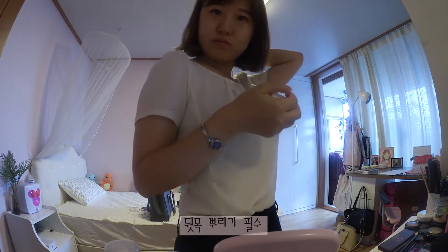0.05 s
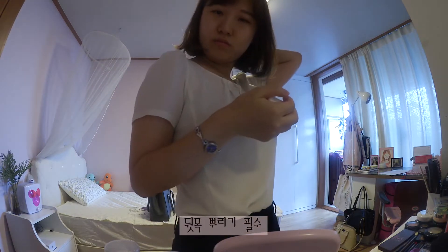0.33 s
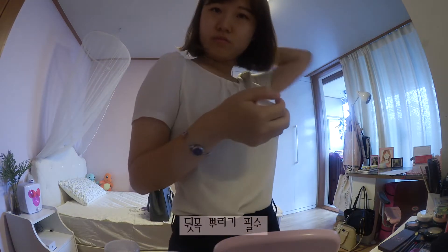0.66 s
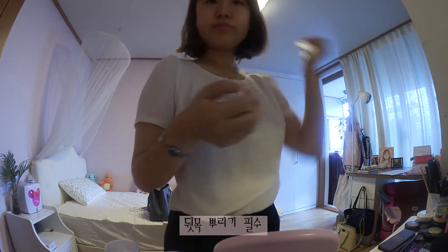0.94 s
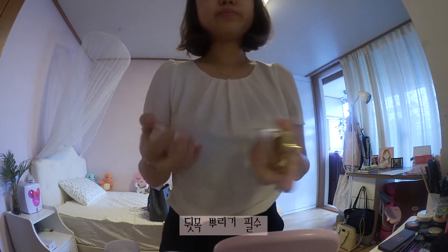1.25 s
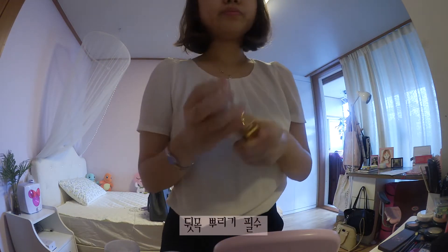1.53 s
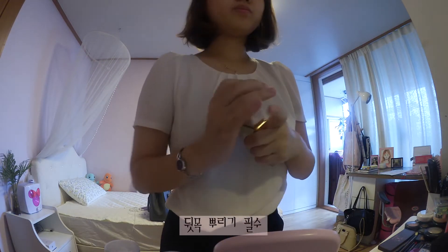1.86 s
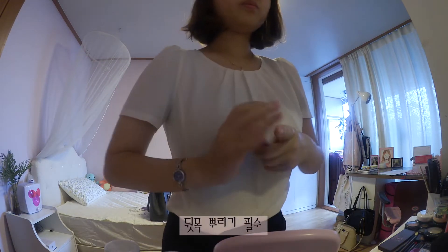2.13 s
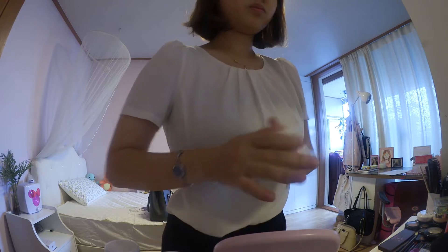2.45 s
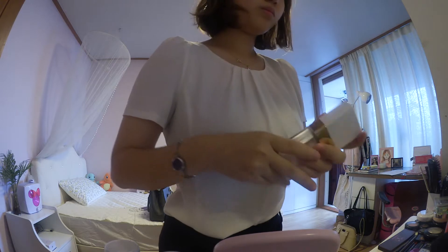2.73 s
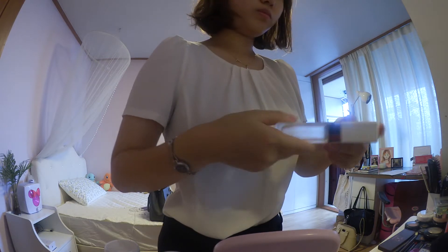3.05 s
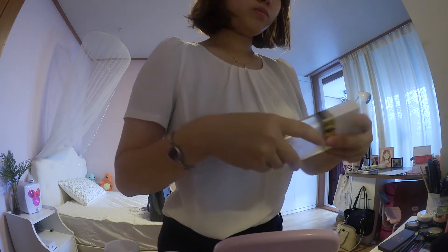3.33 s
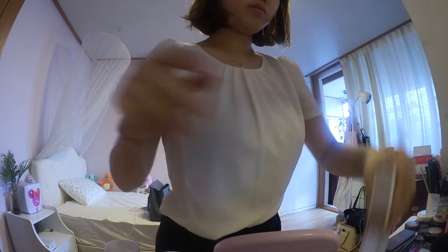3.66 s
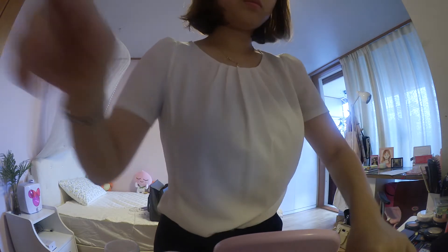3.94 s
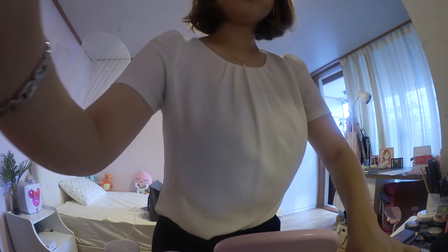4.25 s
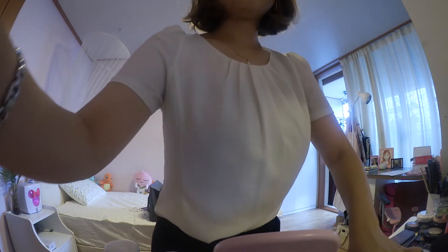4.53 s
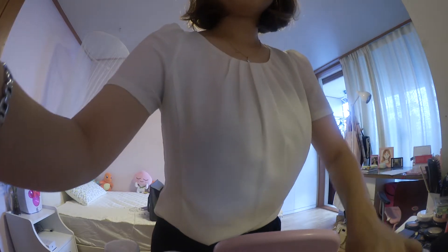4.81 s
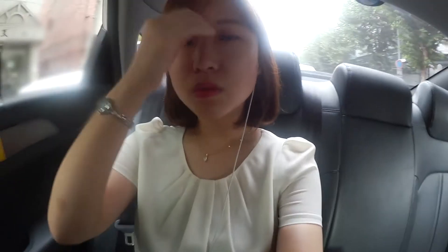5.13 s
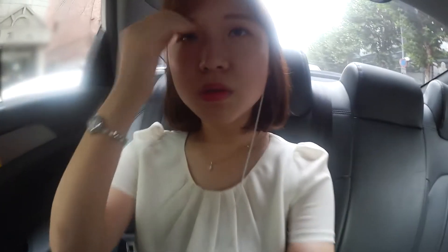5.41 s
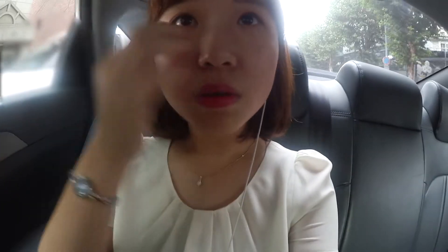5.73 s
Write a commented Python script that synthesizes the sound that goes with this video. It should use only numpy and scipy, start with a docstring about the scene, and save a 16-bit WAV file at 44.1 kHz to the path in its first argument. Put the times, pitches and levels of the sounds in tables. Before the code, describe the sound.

One short perfume spray, a plastic cap rattling and snapping shut, objects knocking on a wooden table, then low rumble inside a car.

```python
"""In a small bedroom a perfume atomiser gives one short puff of hissing mist. Its plastic cap rattles onto the
neck, slides down and snaps home with a thud. Soft swishes follow, among faint ticks: palm wipes on the bottle,
the last one faint. Then the bottle and other things knock on a wooden dressing table and set its top ringing.
Just before five seconds the scene cuts to the low, steady rumble inside a moving car."""
import sys
import numpy as np
from scipy import signal
from scipy.fft import rfft, irfft, next_fast_len
from scipy.io import wavfile

SR = 44100
rng = np.random.default_rng(int(sys.argv[2]) if len(sys.argv) > 2 else 0)


def put_to_file(sound):
    """Save the sound as 16-bit audio at rate SR, in the file named by the first command-line argument."""
    columns = np.atleast_2d(sound).T  # one column per channel
    safe = np.clip(columns, -1, 1)
    whole_steps = np.round(safe * 32767)
    wavfile.write(sys.argv[1], SR, whole_steps.astype(np.int16))


N = 259308
TIME = np.arange(N) / SR
RING = TIME[:SR // 2]  # time axis of one hit and its tail


def undb(db):
    """Decibels to gain."""
    return 10 ** (np.asarray(db) / 20)


def unit(x):
    """Scale to rms 1."""
    return x / np.sqrt(np.mean(x ** 2))


def add(track, s, sound):
    """Mix a sound into a track at time s."""
    start = int(s * SR)
    track[start:start + len(sound)] += sound[:N - start]


def high_pass(x, hz, order=2):
    """Roll off the lows."""
    return signal.sosfilt(signal.butter(order, hz, "high", fs=SR, output="sos"), x)


def low_pass(x, hz, order=1):
    """Roll off the highs."""
    return signal.sosfilt(signal.butter(order, min(hz, SR / 3), fs=SR, output="sos"), x)


def shaped(x, gain):
    """Filter by a gain that is a function of frequency."""
    size = next_fast_len(len(x))
    return irfft(rfft(x, size) * gain(np.fft.rfftfreq(size, 1 / SR) + 1), size)[:len(x)]


def coloured(x, points, size=4096):
    """Minimum-phase EQ through (frequency [Hz], level [dB]) points, keeping the energy."""
    hz, db = np.transpose(points)
    gain = undb(np.interp(np.log(np.fft.rfftfreq(size, 1 / SR) + 1), np.log(hz), db))
    cepstrum = irfft(np.log(gain))[:size // 2]
    response = irfft(np.exp(2 * rfft(cepstrum, size)))
    return np.std(x) * unit(signal.fftconvolve(x, response)[:len(x)])


def resonate(x, hz, q):
    """Pass a sound through one steep-sided resonance, keeping its energy."""
    b, a = signal.iirpeak(hz, max(q, hz / 8000), fs=SR)
    return np.std(x) * unit(signal.lfilter(b, a, signal.lfilter(b, a, x)))


def noise(points):
    """Steady noise of rms 1 with the given EQ curve."""
    return coloured(rng.standard_normal(N), points)


def resonant_noise(hz, q):
    """Steady noise of rms 1 in one resonance."""
    return resonate(rng.standard_normal(N), hz, q)


def wander(hz, size=N):
    """Smooth random modulation of rms 1, rolled off above hz."""
    return unit(shaped(rng.standard_normal(size), lambda f: 1 / (1 + (f / hz) ** 4)))


def fade(t60):
    """Exponential decay, 60 dB down after t60 seconds."""
    return np.exp(-np.log(1000) * RING / t60)


def mode(hz, t60):
    """One struck resonance."""
    return np.sin(2 * np.pi * hz * RING) * fade(t60)


def burst(points, envelope):
    """Many small resonances struck together: coloured noise under an envelope."""
    return coloured(rng.standard_normal(len(RING)), points) * envelope


# room tone EQ: (frequency [Hz], level [dB])
ROOM_TONE_EQ = [(15, -61), (25, -19.5), (84, -16), (117, -21), (141, -11.5), (229, -2.5), (309, -4.5),
                (754, -2), (818, -4), (887, -4.5), (1290, -3), (2110, -9.5), (7510, -16.5), (13600, -24.5),
                (16000, -35)]
def room_tone(db=-58):
    """A faint, steady bed of bedroom air."""
    return undb(db) * noise(ROOM_TONE_EQ)


# rumble EQ inside the car: (frequency [Hz], level [dB])
RUMBLE_EQ = [(15, -62), (25, -44), (76, -28), (117, -9.5), (175, -10.5), (223, -6.5), (309, -7.5),
             (503, -1), (1070, -9), (1160, -7), (1650, -16), (3620, -22), (7510, -28), (12900, -34.5),
             (16000, -44)]
def cabin(rumble_db=-52.5, boom_hz=177.4, boom_db=-66, sway_db=.3):
    """Road and engine rumble through the car body and boom in the cabin, swaying with the road."""
    sway = undb(sway_db * wander(hz=6))
    rumble = undb(rumble_db) * noise(RUMBLE_EQ)
    boom = undb(boom_db) * resonant_noise(boom_hz, q=12)
    return (rumble + boom) * sway


# bedroom reverb: (frequency [Hz], decay t60 [s], level [dB])
REVERB_BANDS = [(250, 0.27, 1.5), (1498, 0.23, 2.5), (4000, 0.12, -3), (7950, 0.28, 0.5),
                (14000, 0.14, -3.5)]
def bedroom(x, wet_db, first_echo_s=0.0011):
    """Add a short diffuse tail, built in octave bands; bedding and curtains soak it up."""
    hz, t60, db = np.transpose(REVERB_BANDS)
    white, tail = rng.standard_normal(len(RING)), 0
    for centre in 125 * 2 ** np.arange(8):
        band = shaped(white, lambda f: np.clip(1 - np.abs(np.log2(f / centre)), 0, 1))
        band_t60, band_db = (np.interp(np.log(centre), np.log(hz), column) for column in (t60, db))
        tail += undb(band_db) * band * fade(band_t60)
    tail *= np.clip(RING / first_echo_s - .5, 0, 1)
    return x + undb(wet_db) * signal.fftconvolve(x, tail / np.linalg.norm(tail))[:N]


def nearby_echoes(x, echo_db=-9, count=8, latest_s=.02):
    """Early reflections off body, walls and ceiling comb-filter a hiss."""
    lags = (SR * rng.uniform(.001, latest_s, count)).astype(int)
    echoes = sum(np.pad(x, (lag, 0))[:N] for lag in lags)
    return (x + undb(echo_db) * echoes) / np.sqrt(1 + count * undb(echo_db) ** 2)


# tick cues: (time [s], level [dB], centre [Hz])
TICK_CUES = [(0.228, -47, 1840), (1.029, -44.5, 2230), (1.051, -42, 2450), (1.068, -45.5, 1670),
             (1.131, -53.5, 4080), (1.275, -42.5, 1000), (2.621, -54, 3590), (2.749, -50, 2600),
             (3.103, -58, 5000), (3.332, -49.5, 2480), (4.224, -51, 6500)]
def ticks(t60=0.045, q=2.3, attack_s=0.00076):
    """Fingers and a bracelet touch the bottle in small, damped ticks."""
    out = np.zeros(N)
    for s, db, hz in TICK_CUES:
        touch = rng.standard_normal(len(RING)) * fade(t60) * (1 - np.exp(-RING / attack_s))
        add(out, s, undb(db) * resonate(touch, hz, q))
    return out


# EQ of the rubbing hiss: (frequency [Hz], level [dB])
SWISH_EQ = [(300, -11), (1000, 2.5), (2400, 0), (3300, -7), (4300, -2), (5100, -3), (6000, 0.5), (6700, 0),
            (7800, 0.5), (10000, -4), (15500, -18.5)]
# whistles in that hiss: (centre [Hz], width [Hz], level [dB])
SWISH_WHISTLES = [(4180, 150, -19), (6040, 220, -13.5), (9500, 150, -17), (11400, 150, -17.5),
                  (14000, 1500, -14.5)]
# five palm wipes, the last one faint: (peak time [s], release [s], hiss level [dB], hollow level [dB])
SWISH_CUES = [(2.145, 0.058, -49, -55), (2.354, 0.025, -48.5, -39), (2.410, 0.044, -53.5, -42.5),
              (2.828, 0.061, -50, -50), (3.310, .062, -64, -81)]
def swishes(lowest_hz=890, sag_hz_per_db=2.5, hollow_lead_s=0.013, flutter_db=2.5, attack_share=0.42):
    """Soft hisses: a palm wipes the glass, its cupped hollow fluttering; the last wipe is faint."""
    def swell(s, release):
        width = np.where(TIME < s, attack_share * release, release)
        return 1 / np.cosh(np.clip((TIME - s) / width, -30, 30))
    hiss = undb(-1) * noise(SWISH_EQ)
    hiss += sum(undb(db) * resonant_noise(hz, hz / width) for hz, width, db in SWISH_WHISTLES)
    out, tightest_db = np.zeros(N), max(row[-1] for row in SWISH_CUES)
    for s, release, hiss_db, hollow_db in SWISH_CUES:
        # the tighter the hand cups, the louder and lower its hollow sounds
        hollow_hz = lowest_hz + sag_hz_per_db * (tightest_db - hollow_db)
        hollow = unit(resonant_noise(hollow_hz, q=6.2) * undb(flutter_db * wander(hz=50)))
        out += undb(hiss_db) * hiss * swell(s, release)
        out += undb(hollow_db) * hollow * swell(s - hollow_lead_s, release)
    return out


# airy EQ of the mist: (frequency [Hz], level [dB])
MIST_EQ = [(1000, -9), (3000, -9), (5000, -3), (7500, 1), (11000, -1.5), (15500, -14)]
# two spurts in one press: (time [s], level [dB], attack [s], hold [s])
SPURT_CUES = [(0.054, -50, .002, .002), (.085, -49, .006, 0.0094)]
def atomiser(release_t60=0.12):
    """Mist hisses through the nozzle; each spurt tails off as the pressure behind it dies away."""
    flow = np.zeros(N)
    for s, db, attack_s, hold_s in SPURT_CUES:
        attack = np.minimum(1, RING / attack_s)
        release = np.minimum(1, fade(release_t60) * undb(60 * (attack_s + hold_s) / release_t60))
        add(flow, s, undb(db) * attack * release)
    return noise(MIST_EQ) * flow


# ring of the table top: (frequency [Hz], level [dB], decay t60 [s])
WOOD_MODES = [(200.7, -19, 0.15), (237.4, -18.5, .11), (322.4, -6.5, 0.088), (377, -11, 0.07),
              (452, -9.5, 0.1), (499, -16, 0.063), (590, -22.5, 0.078), (621, -11, 0.05),
              (688, -15.5, 0.14), (826, -16.5, 0.19), (960, -15.5, 0.11), (1034, -12.5, 0.063),
              (1192, -14, 0.062), (1330, -29, 0.052), (1482, -16, 0.024), (2010, -9.5, 0.022),
              (2392, -17.5, 0.053)]
# dense small resonances of the table and what stands on it: (frequency [Hz], level [dB])
CLATTER_EQ = [(100, -49), (220, 5.5), (500, 5), (1100, -2), (1700, -4), (2400, -16), (3200, -17.5),
              (6000, -16), (16000, -56)]
# click of first contact: (frequency [Hz], level [dB])
CLICK_EQ = [(200, -0.5), (1000, 8), (2400, 2.5), (3500, -7.5), (6000, -18), (9000, -31), (16000, -53)]
# knock cues: (time [s], level [dB], low-pass corner [Hz])
KNOCK_CUES = [(4.0120, -17.5, 2150), (4.0637, -25.5, 1650), (4.0900, -29, 1750), (4.2246, -41, 3120),
              (4.4890, -20, 930), (4.695, -40.5, 890), (4.7113, -9.5, 2220), (4.72, -14.5, 1400),
              (4.7503, -17, 1820), (4.757, -24.5, 1950), (4.7700, -24, 950), (4.821, -31.5, 2700),
              (4.8860, -39, 1300), (4.9140, -41, 1650)]
def dressing_table(clatter_db=-7, hard_hz=1950, click_db_per_octave=15.5, low_cut_share=0.078):
    """Knocks on the wooden top; a softer contact is duller, a harder one clicks and has less bass."""
    out = np.zeros(N)
    for s, db, corner_hz in KNOCK_CUES:
        spot = undb(rng.standard_normal(len(WOOD_MODES)))  # each spot favours other modes
        wood = sum((-1) ** (k // 3) * spot[k] * undb(mode_db) * mode(hz, t60)
                   for k, (hz, mode_db, t60) in enumerate(WOOD_MODES))
        clatter = undb(clatter_db) * burst(CLATTER_EQ, fade(t60=.12))
        body = low_pass(wood + clatter, corner_hz, order=2)
        body = high_pass(body, low_cut_share * corner_hz, order=1)
        click_db = -4 + click_db_per_octave * np.log2(corner_hz / hard_hz)
        click = undb(click_db) * burst(CLICK_EQ, fade(t60=0.013))
        add(out, s, undb(db) * (body + click))
    return high_pass(out, hz=195, order=8)


# EQ of the filled bottle, damped by the hand: (frequency [Hz], level [dB])
BOTTLE_EQ = [(150, -29.5), (330, -1), (480, 4), (750, -7.5), (1100, 6), (1700, -8.5), (2600, -2),
             (3500, -12), (7000, -16), (14000, -41)]
def thud(db, tail_db=-16):
    """A blow passes into the filled bottle and the hand: a quick punch and a quieter tail."""
    envelope = .5 * fade(t60=0.0066) + undb(tail_db) * fade(t60=0.097)
    return undb(db) * burst(BOTTLE_EQ, envelope)


def cavity(db, hz, t60=0.13, gap_loss=7, glide=0.043, glide_s=0.015, rattle_db=-6):
    """The air under the cap rings and bends up in pitch as the cap slides down."""
    wobble = 0.024 * wander(hz=70, size=len(RING))  # the loose cap rocks, opening and closing the gap
    pitch = hz * (1 - glide * np.exp(-RING / glide_s) + wobble)
    tone = np.sin(2 * np.pi * np.cumsum(pitch) / SR)
    rattle = undb(rattle_db) * resonate(rng.standard_normal(len(RING)), hz=1550, q=1)
    # strong swings lose energy faster in the gap
    envelope = undb(db) * fade(t60) / (1 + gap_loss * undb(db) * (1 - fade(t60)))
    return high_pass((tone + rattle) * envelope, hz=700)


# ring of the plastic shell: (frequency [Hz], level [dB], decay t60 before damping [s])
SHELL_MODES = [(1510, -22.5, 0.038), (1643, -16, 0.032), (2304, -5.5, 0.032), (2570, -1.5, 0.016),
               (2725, -6, 0.023), (3167, -12, 0.013), (4243, -3, 0.009), (4718, -12, 0.026),
               (5260, -17.5, 0.014), (6070, -14, 0.013), (6830, -15.5, 0.0065), (7470, -22.5, 0.0093),
               (10750, -35.5, 0.0094)]
# scrape of the cap on the neck: (frequency [Hz], level [dB])
SCRAPE_EQ = [(200, -31), (700, -27), (1200, -10), (2500, -2.5), (3600, -1), (5000, -1.5), (8000, -6.5),
             (10000, -17), (16000, -27.5)]
def clack(db, tilt_db, pitch, ring_share=.78, scrape_db=-11.5, scrape_growth=0.74):
    """One contact rings and scrapes the hand-damped shell; lighter touches lean towards scrape."""
    def tilt(hz):
        return tilt_db * np.log2(hz / 2500)
    detune = pitch * (1 + 0.0055 * rng.standard_normal(len(SHELL_MODES)))  # the grip varies per hit
    shell = sum((-1) ** k * undb(mode_db + tilt(hz)) * mode(hz * detune[k], t60 * ring_share)
                for k, (hz, mode_db, t60) in enumerate(SHELL_MODES))
    scrape = burst([(hz, level + tilt(hz)) for hz, level in SCRAPE_EQ], fade(t60=0.013))
    return undb(db) * shell + undb(scrape_db + scrape_growth * db) * scrape


# the loose cap against the neck:
# (time [s], level [dB], tilt [dB/octave], shell pitch [ratio], cavity pitch [Hz], cavity level [dB])
RATTLE_CUES = [(1.4403, -1, 4.5, 1.02, 1133, -31.5), (1.4516, -7.5, 8, 0.92, 1677, -19.5),
               (1.4573, -11.5, 7.5, 0.99, 1623, -25.5), (1.5095, -8.5, -5.5, 1.017, 1237, -21.5),
               (1.5156, -25, 10.5, 1.25, 1550, -28.5), (1.5988, -38, 4.5, 0.86, 1103, -39.5),
               (1.7464, -12.5, 3.5, 1.08, 1625, -35), (1.823, -1, -2.5, .99, 1121, -21),
               (1.8362, -8, -2, 1.09, 1143, -6.5), (1.8404, -6, 0.5, .93, 1273, -9.5)]
# the cap over its retaining ridge: (time [s], level [dB], tilt [dB/octave], thud level [dB])
SNAP_CUES = [(1.9636, -33, -3, -22.5), (1.9804, -25, 2, -39), (1.9844, 1, -2.5, -8)]
def cap(loose_thud_db=-33, attack_s=0.00054, slide_at_s=1.7915, slide_length_s=0.018, slips_per_s=330):
    """The cap clacks loosely on the neck, sticks and slips down it, and snaps home with a thud."""
    out, attack = np.zeros(N), 1 - np.exp(-RING / attack_s)
    for s, db, tilt_db, pitch, cavity_hz, cavity_db in RATTLE_CUES:
        hit = clack(db, tilt_db, pitch) + cavity(cavity_db, cavity_hz) + thud(db + loose_thud_db)
        add(out, s, attack * hit)
    for s, db, tilt_db, thud_db in SNAP_CUES:
        snap = clack(db, tilt_db, pitch=0.99, ring_share=0.49)  # the ridge chokes the ring
        add(out, s, attack * (snap + thud(thud_db)))
    slip = attack * (clack(db=-28, tilt_db=0, pitch=0.92) + cavity(db=-35, hz=1500))
    for s in np.arange(0, slide_length_s, 1 / slips_per_s):
        force = .5 + .5 * np.sin(np.pi * s / slide_length_s)
        jitter_s = .15 * rng.standard_normal() / slips_per_s
        add(out, slide_at_s + s + jitter_s, force * slip)
    return low_pass(high_pass(out, hz=240, order=3), hz=12000)


def scene(room_ends_s=4.958, car_starts_s=4.977):
    """The bedroom, a blink of silence, then a hard cut to the car."""
    hisses = bedroom(nearby_echoes(atomiser() + swishes()), wet_db=-18.5)
    clicks = bedroom(cap() + ticks(), wet_db=-17)
    knocks = bedroom(dressing_table(), wet_db=-16.5)
    indoors = hisses + clicks + knocks + room_tone()
    return (indoors * (TIME < room_ends_s) + cabin() * (TIME > car_starts_s))[None]


def record(dry, ceiling=1.2, top_hz=15700):
    """A small microphone soft-clips the loudest peaks and cuts the top end."""
    rounded = ceiling * np.tanh(dry / ceiling)
    return signal.sosfilt(signal.ellip(10, .2, 70, top_hz, fs=SR, output="sos"), rounded)


dry = scene()
out = record(dry)
put_to_file(out)
```